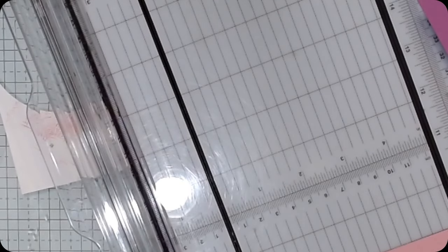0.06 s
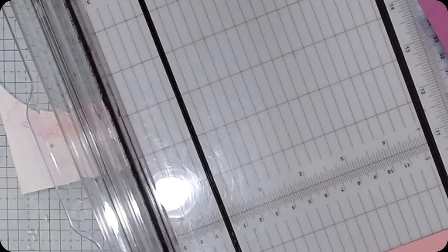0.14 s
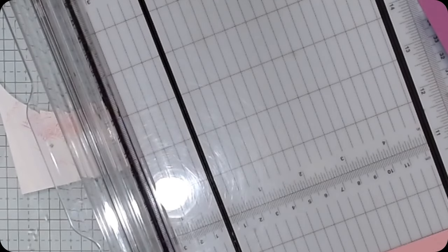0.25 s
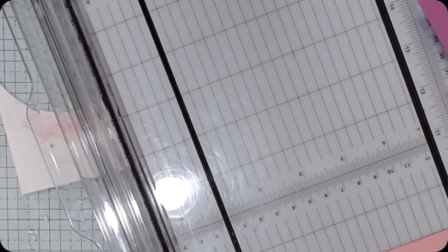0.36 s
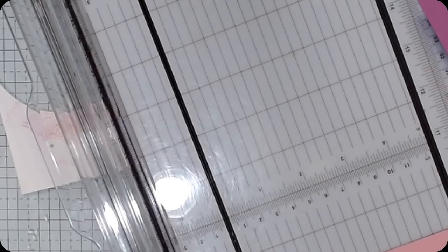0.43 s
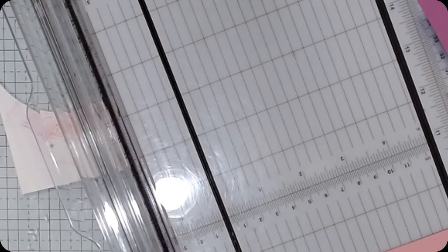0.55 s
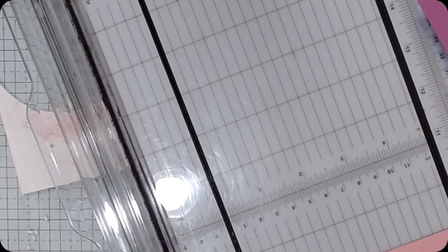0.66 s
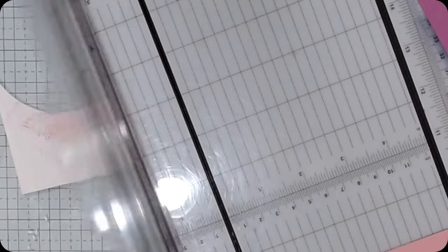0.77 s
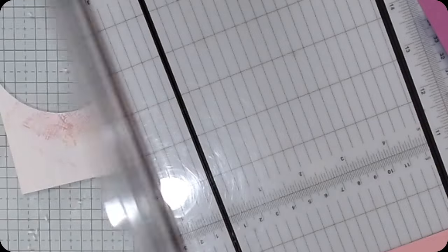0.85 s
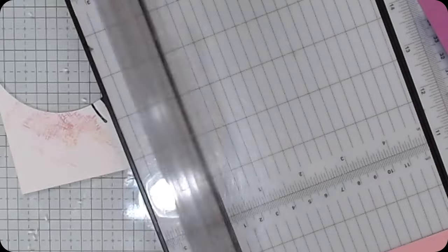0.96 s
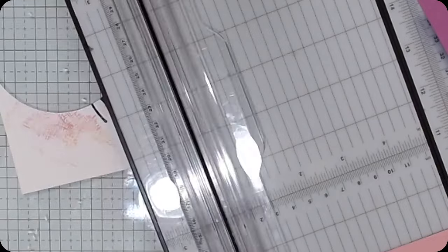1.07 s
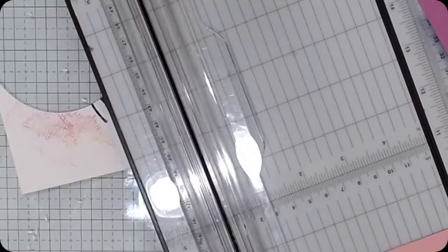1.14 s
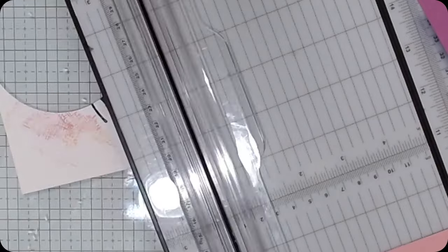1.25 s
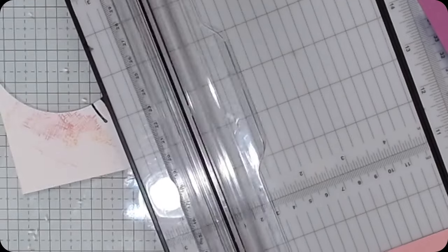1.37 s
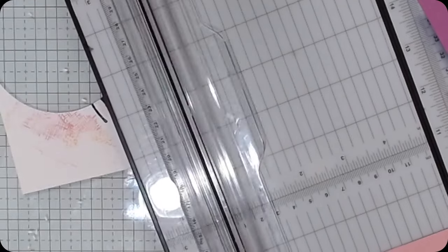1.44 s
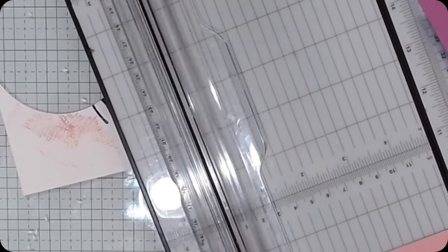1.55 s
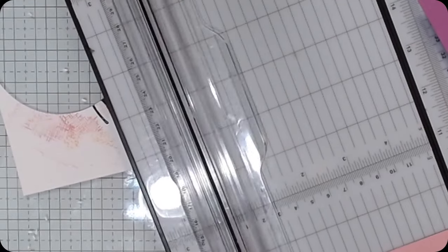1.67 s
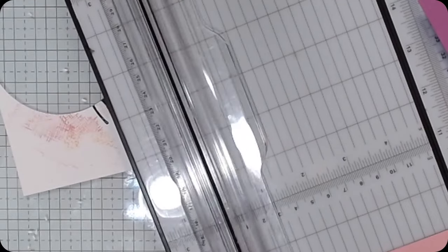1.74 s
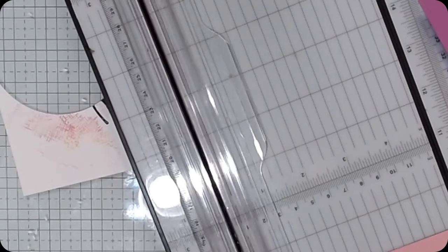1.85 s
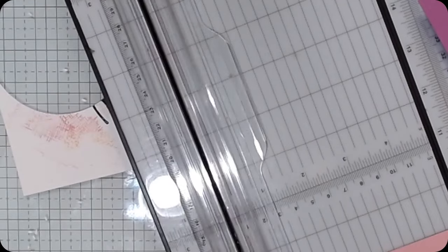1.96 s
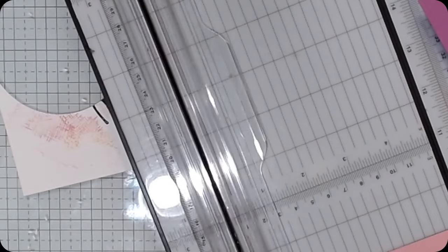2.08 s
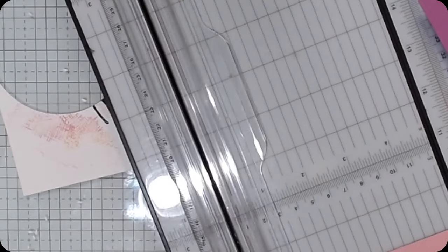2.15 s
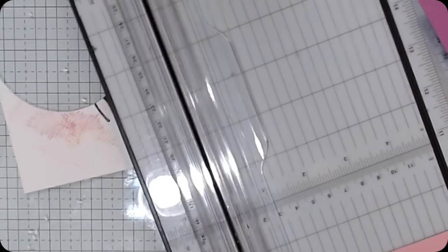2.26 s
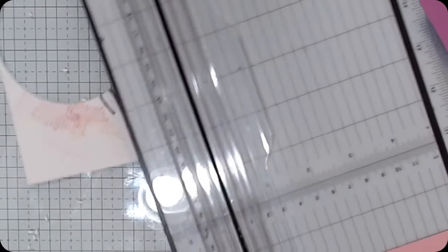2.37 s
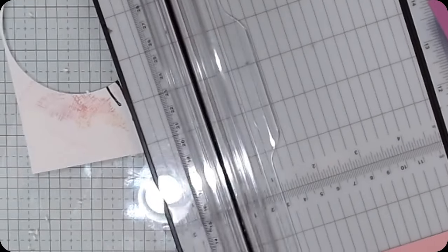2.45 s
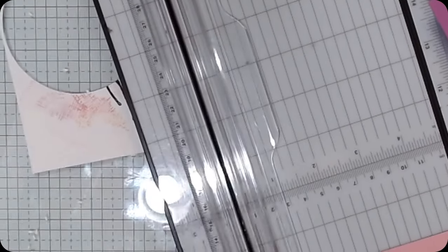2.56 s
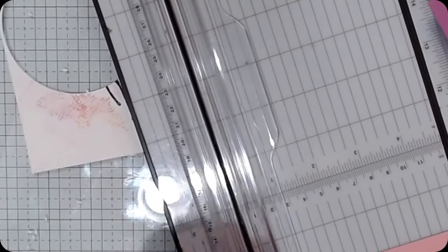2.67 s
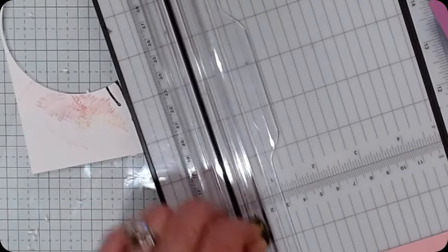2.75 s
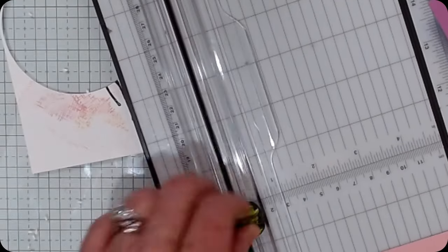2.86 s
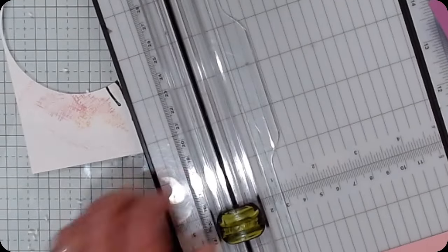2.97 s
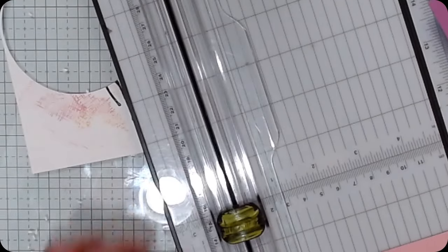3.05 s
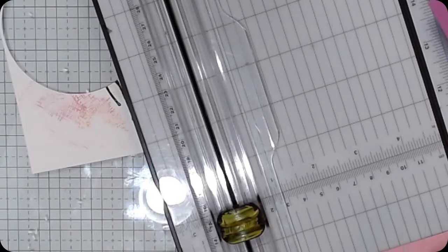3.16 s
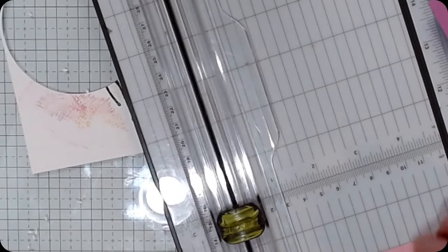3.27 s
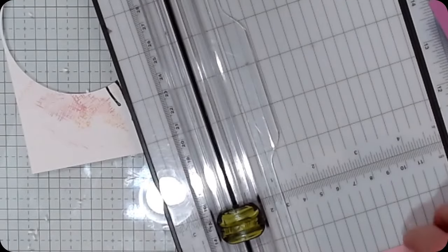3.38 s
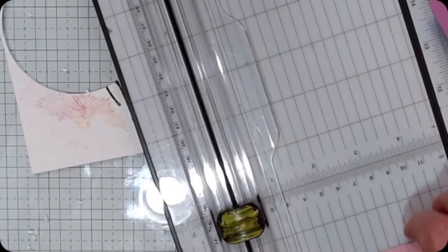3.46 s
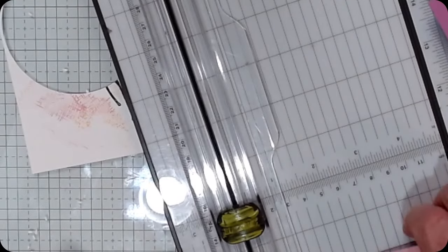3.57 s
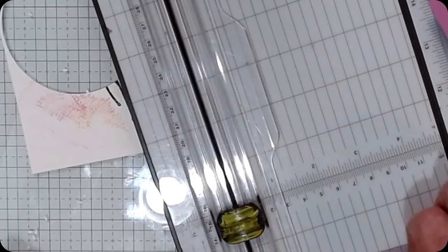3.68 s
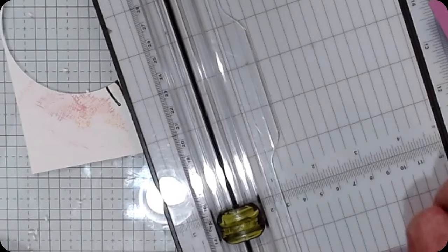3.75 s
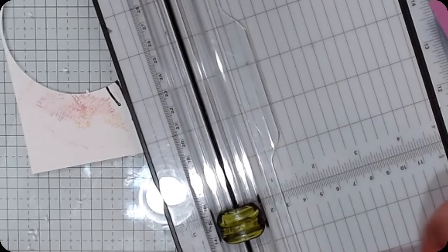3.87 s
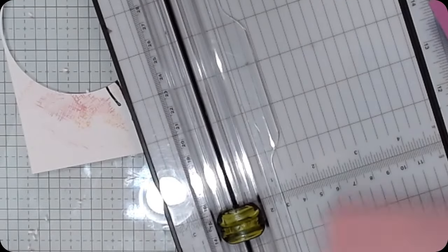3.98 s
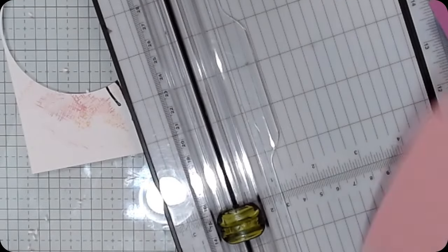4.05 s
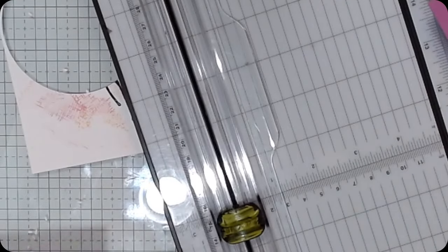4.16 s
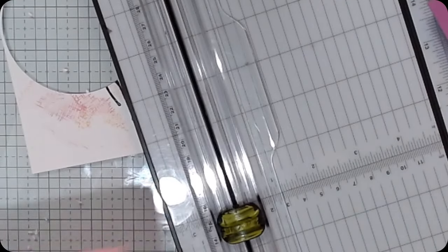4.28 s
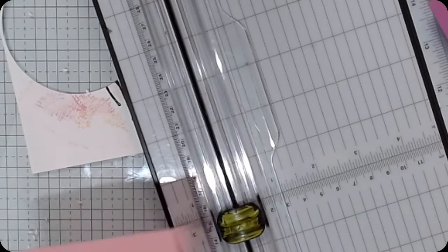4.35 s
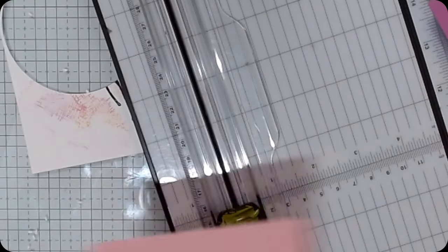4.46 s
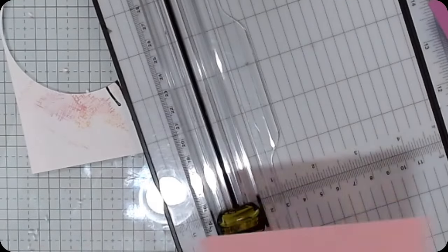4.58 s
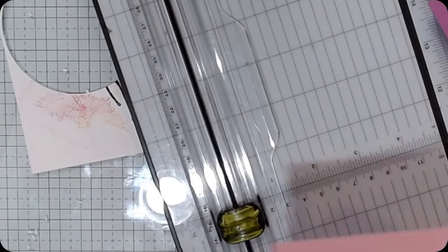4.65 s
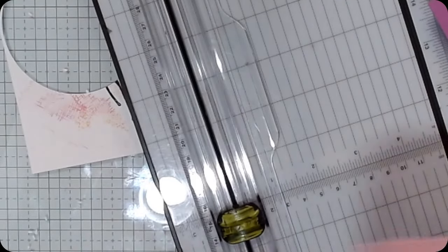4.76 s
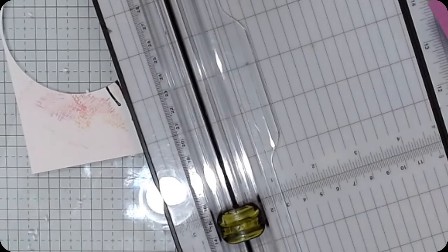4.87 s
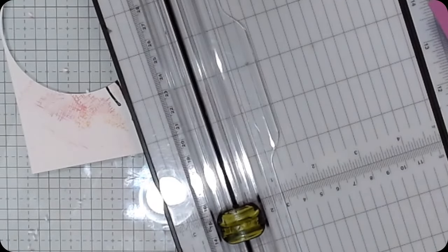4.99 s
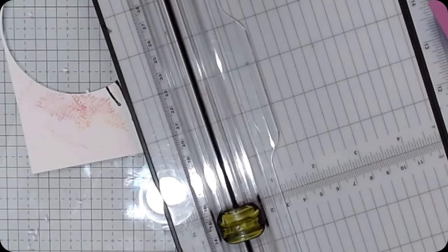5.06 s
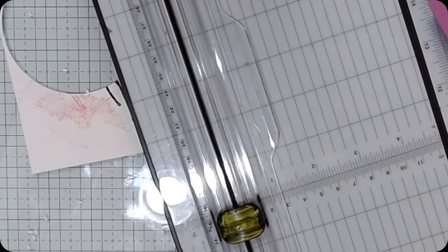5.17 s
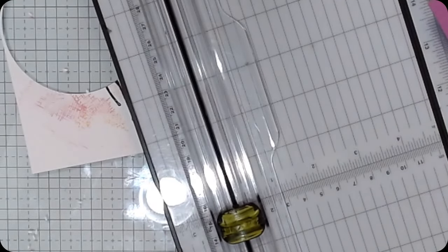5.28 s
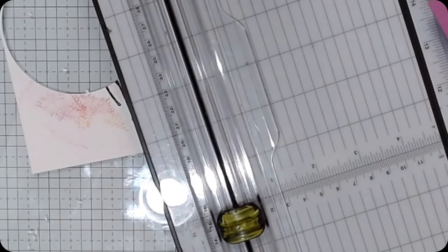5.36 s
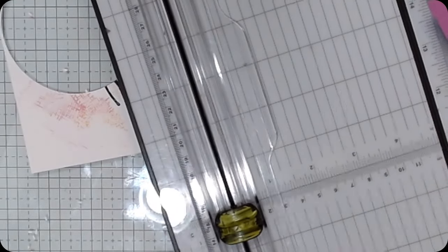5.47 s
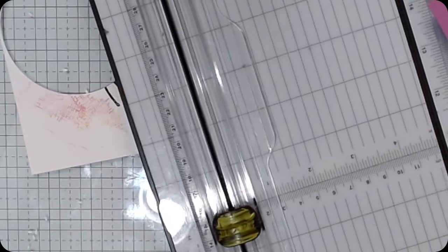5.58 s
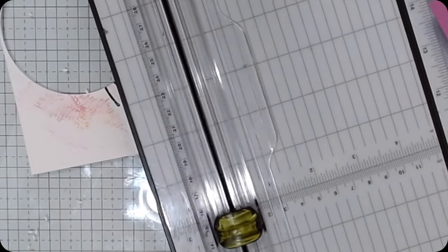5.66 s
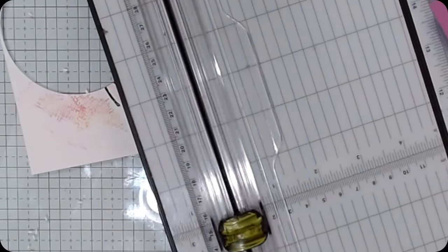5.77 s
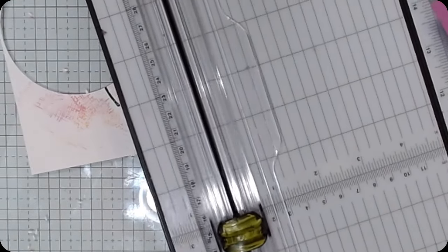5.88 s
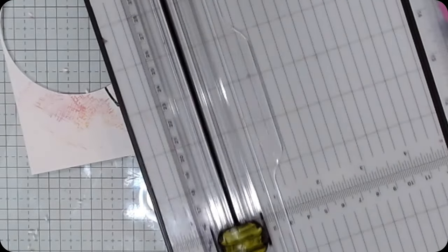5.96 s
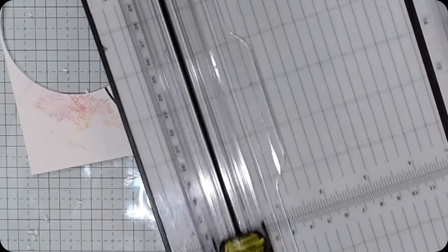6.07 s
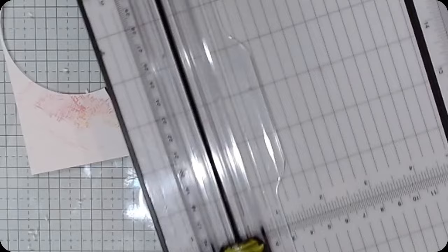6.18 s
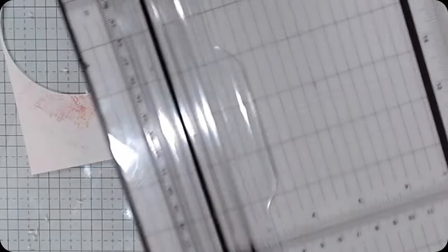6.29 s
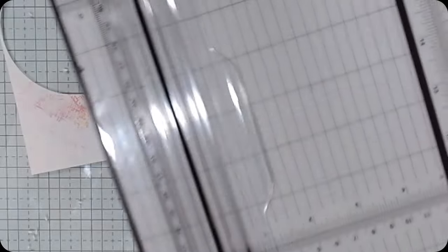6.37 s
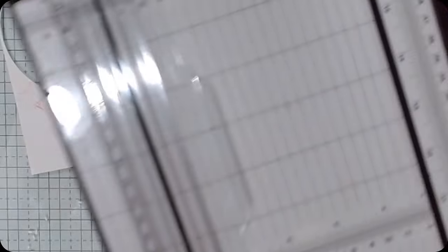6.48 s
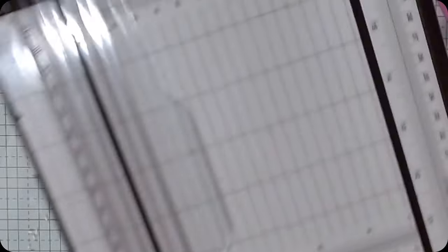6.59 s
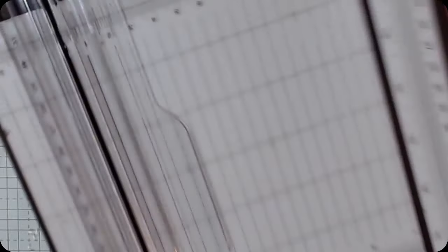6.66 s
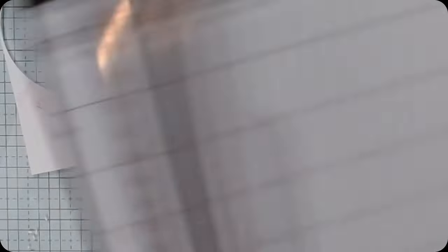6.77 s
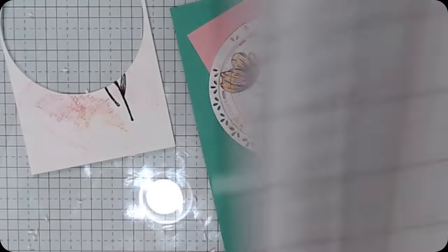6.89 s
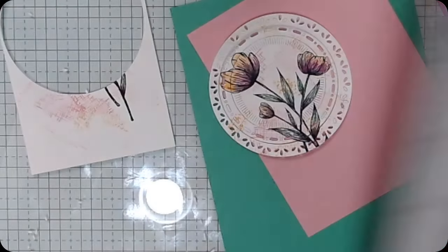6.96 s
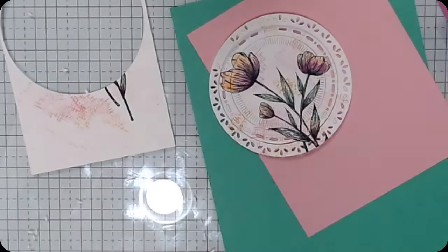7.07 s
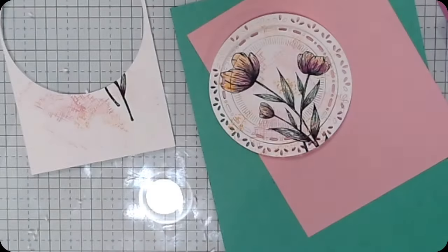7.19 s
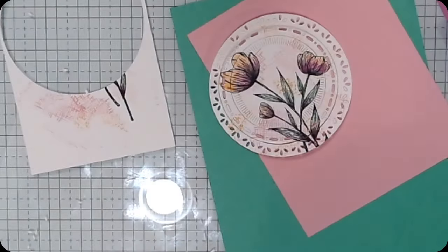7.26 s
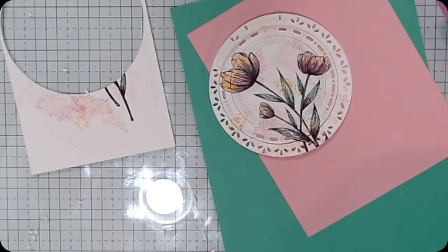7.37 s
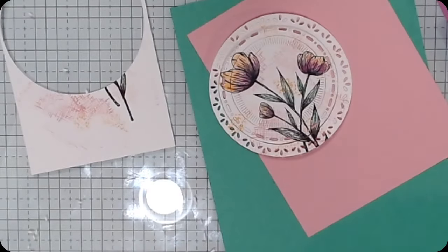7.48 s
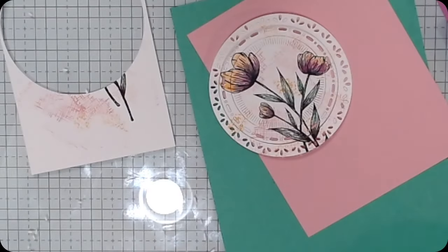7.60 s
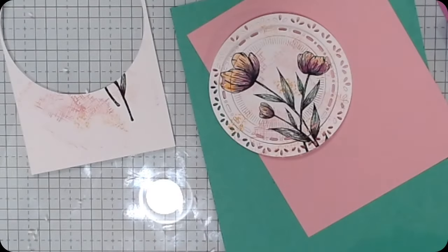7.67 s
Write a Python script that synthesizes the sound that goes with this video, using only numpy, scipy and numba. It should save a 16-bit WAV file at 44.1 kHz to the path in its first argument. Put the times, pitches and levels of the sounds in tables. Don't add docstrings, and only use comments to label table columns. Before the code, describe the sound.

A plastic paper trimmer is handled on a craft table in a small quiet room. After near silence, its hollow rail drops with a rattle and the latch snaps very sharply. A short rasping carriage slide ends in a knock, followed by crisp card snaps, taps and dry rustles. Sparse clicks continue until the base briefly judders over the mat and is lifted away. Close stereo microphones, dullish top, low ventilation and faint mains hum.

```python
import sys
import numpy as np
from scipy import signal
from scipy.fft import rfft, irfft
from scipy.io import wavfile
from scipy.ndimage import uniform_filter1d
from numba import njit

SR = 44100
rng = np.random.default_rng(int(sys.argv[2]) if len(sys.argv) > 2 else 0)


def materialize(psi):
    bounded = np.clip(np.atleast_2d(psi).T, -1, 1)
    quanta = np.round(bounded * 32767).astype(np.int16)
    wavfile.write(sys.argv[1], SR, quanta)


def magnitude_from_level(level_db):
    exponent = np.asarray(level_db, float) / 20
    return 10 ** exponent


N = 340893
T_S = np.arange(N) / SR


# (frequency [Hz], level [dB], t60 [s])
RAIL_MODES = [(610, -7, .035), (790, -6, .022), (985, -5, .018), (1240, -4, .016), (1530, -2, .013),
              (1750, -2, .012), (2000, -1, .011), (2300, -1, .01)]
# (frequency [Hz], level [dB], t60 [s])
EDGE_MODES = [(2860, 0, .012), (3310, -1, .011), (3560, -2, .01), (4090, -3, .008), (4700, -3, .007),
              (5400, -5, .006), (6300, -10, .005)]
# (frequency [Hz], level [dB], t60 [s])
TABLE_MODES = [(93, -2, 0.074), (133, -12.5, 0.34), (173, -1, 0.13), (266, 6.5, 0.025), (380, 0, 0.038)]


def strike(blows, thud_db, rattle_ms, tick, rise):
    size = 4000
    out, t = np.zeros(N + size), np.arange(size) / SR
    rattle_s = rattle_ms / 1000
    for s, db, own_hz, crack_db in blows:
        ragged = rng.standard_normal(size) * np.minimum(t / (rise * rattle_s), 1)
        ragged[0] = tick
        settle = np.exp(-t / 0.02)
        loose = butter(ragged * settle, 1, (600, 4300))

        own = [(own_hz, 8 + 2 * np.log2(own_hz / 1000), 15 / own_hz)]
        rail = RAIL_MODES + (own if own_hz < 2500 else [])
        edges = EDGE_MODES + (own if own_hz >= 2500 else [])
        body_contact = ragged * (np.exp(-t / rattle_s) + magnitude_from_level(-21.5) * settle)
        edge_contact = ragged * (np.exp(-t / (0.7 * rattle_s)) + magnitude_from_level(-31.5) * settle)
        body = ring(rail, body_contact, (560, 2900), snap=5, scatter_db=1.5)
        crack = ring(edges, edge_contact, (2600, 5900), snap=6, scatter_db=1)
        thud = ring(TABLE_MODES, np.hanning(60), (50, 500), snap=0, scatter_db=5)

        hit = body + magnitude_from_level(-15.5) * loose - magnitude_from_level(crack_db) * crack + magnitude_from_level(thud_db) * thud
        i = int((s + 0.0006) * SR)
        out[i:i + size] += magnitude_from_level(db) * hit
    return out[:N]


def ring(modes, contact, band_hz, snap, scatter_db, detune=0.063):
    t = np.arange(4000) / SR
    hz, db, t60_s = np.transpose(modes)[:, :, None]
    pitch_spot, level_spot = rng.standard_normal((2, len(modes), 1))
    tones = np.sin(2 * np.pi * hz * (1 + detune * pitch_spot) * t) * decay(t, t60_s)
    sense = (-1.) ** np.arange(len(modes))[:, None]
    tones = np.sum(sense * magnitude_from_level(db + scatter_db * level_spot) * tones, axis=0)
    tones[0] = snap * np.sqrt(np.sum(tones ** 2))
    y = butter(signal.fftconvolve(tones, contact)[:len(t)], 3, band_hz)
    return y / np.max(np.abs(y))


# (time [s], body peak [dB], own ring [Hz], crack re body [dB])
SLAMS = [
    (1.1309, -16.5, 800, -30),
    (1.138, -17.5, 3330, -8),
    (1.148, -21.5, 590, -23),
    (1.7761, -16, 1430, -8),
    (1.792, -20, 899, -19.5),
    (1.821, -20, 1480, -7),
]


def slams():
    return strike(SLAMS, thud_db=-18.5, rattle_ms=4, tick=0.6, rise=0.6)


# (time [s], body peak [dB], own ring [Hz], crack re body [dB])
STOPS = [
    (1.8105, -7, 1900, 0.95),
    (2.7595, -22, 693, 1),
]


def stops():
    return strike(STOPS, thud_db=-22.5, rattle_ms=2.9, tick=1.4, rise=0.31)


# (time [s], body peak [dB], own ring [Hz], crack re body [dB])
CLICKS = [(0.791, -31, 1300, -9.5), (1.372, -35.5, 1270, -17), (1.378, -36, 844, -23),
          (1.391, -38.5, 580, -32), (2.014, -35, 750, -10.5), (2.102, -52.5, 950, -4),
          (2.269, -25.5, 810, 0), (3.375, -27, 750, -1), (3.561, -32.5, 2126, -6.5), (3.57, -33, 2040, -24),
          (3.578, -35, 1380, -17), (3.886, -33, 1366, -15), (4.217, -36, 1090, -1),
          (4.703, -48.5, 900, 0.5), (4.732, -36, 1200, -4), (4.783, -42.5, 1540, -12),
          (5.435, -36, 2790, 3), (5.512, -49, 2830, -17), (5.636, -45.5, 1870, 5.5),
          (5.745, -29.5, 770, -13), (5.788, -45.5, 735, -26), (6.126, -50.5, 764, -14.5),
          (6.451, -37.5, 760, -5), (6.462, -37.5, 750, -15)]


def clicks():
    return strike(CLICKS, thud_db=-18, rattle_ms=1, tick=3.1, rise=0.6)


# (time [s], body peak [dB], own ring [Hz], crack re body [dB])
KNOCKS = [(1.1, -34.5, 1000, -12), (0.977, -49, 778, -21), (1.03, -41.5, 1740, -26), (1.859, -29, 590, -10),
          (2.034, -37.5, 901, -25), (2.765, -21.5, 870, -11), (3.3615, -26.5, 1650, -1.5),
          (3.75, -41.5, 2420, 2), (3.894, -26.5, 1373, -1), (3.913, -24.5, 1446, -10),
          (5.305, -44, 1430, -29), (5.544, -53.5, 746, -28), (5.928, -56, 1650, -13),
          (5.95, -35.5, 2010, -4), (6.469, -34.5, 762.4, -6), (6.839, -38.5, 1725, -9),
          (7.006, -58, 1720, 7)]


def knocks():
    return strike(KNOCKS, thud_db=-19, rattle_ms=3.1, tick=0.25, rise=0.33)


# (time [s], body peak [dB], own ring [Hz], crack re body [dB])
SNAPS = [
    (2.9205, -26.5, 3680, 2.5),
    (3.8775, -24.5, 3030, 0.5),
    (3.9715, -22.5, 1470, -8),
]


def snaps():
    return strike(SNAPS, thud_db=-26, rattle_ms=1.3, tick=3.1, rise=0.5)


# (time [s], body peak [dB], own ring [Hz], crack re body [dB])
SCUFFS = [(3.003, -29.5, 1800, -8), (5.1, -44.5, 1600, -7), (3.732, -48.5, 2000, 2), (3.2, -48, 1900, 18),
          (3.853, -45, 1700, -1), (3.951, -34.5, 3360, 4.5), (1.803, -22.5, 940, -4.5),
          (1.862, -30, 790, -4), (3.581, -40.5, 617, -12), (3.382, -39, 1600, 3), (1.165, -35.5, 620, -0.5),
          (1.205, -39, 1300, -14), (1.4, -46, 1200, -20), (1.2, -53, 1400, -4), (2.4, -52.5, 1300, -12.5),
          (2.262, -44, 790, -7), (1.178, -37, 890, -12), (3, -36.5, 600, -14), (3.4, -39, 900, -6)]


def scuffs():
    return strike(SCUFFS, thud_db=-15, rattle_ms=5.4, tick=0.064, rise=1.1)


# (time [s], body peak [dB], own ring [Hz], crack re body [dB])
BUMPS = [(0.901, -50, 780, -29), (1.579, -53.5, 824, -2), (1.705, -30, 1300, -14.5),
          (2.221, -34.5, 740, -11), (2.28, -33, 820, -6.5), (3.168, -43, 780, -12), (3.463, -36, 620, -15),
         (4.196, -57, 1096, -14), (4.365, -52.5, 1300, -22), (4.386, -40.5, 1550, -22),
         (4.414, -53, 1690, 3), (5.399, -58, 611, -11), (6.3, -56.5, 630, -13.5), (7.202, -61.5, 1030, -9)]


def bumps():
    return strike(BUMPS, thud_db=-9.5, rattle_ms=5.1, tick=0.2, rise=0.5)


# (time [s], body peak [dB], own ring [Hz], crack re body [dB])
TAPS = [
    (0.412, -53.5, 526, 11),
    (0.435, -50, 675, -12),
    (2.193, -55, 776, 5.5),
    (3.292, -45.5, 657, 3),
    (3.304, -38.5, 593, -2),
    (3.314, -29, 610, -4),
]


def taps():
    return strike(TAPS, thud_db=-1.6, rattle_ms=1.5, tick=0.72, rise=1)


# (time [s], peak [dB], frequency [Hz], t60 [s], length of touch [ms])
RINGS = [(1.138, -25, 3500, 0.028, 3.5), (1.15, -33.5, 618, 0.093, 2.3), (1.236, -46.5, 977, .05, 8),
         (1.812, -22.5, 616, 0.052, 1.5), (1.853, -36, 702, .04, 3.2), (2.92, -33.5, 3900, 0.014, 1.2),
         (3.007, -35, 1450, 0.022, 3.4), (3.303, -29, 654, 0.018, 1.7), (3.394, -36, 650, 0.015, 2.5),
         (3.502, -53, 4300, .03, 6.2), (3.749, -39, 2670, 0.023, 2.8), (3.879, -18.5, 3115, 0.007, 0.63),
         (5.307, -49, 1410, 0.023, 3.1), (5.432, -46, 2900, 0.042, 1.5), (5.45, -52, 680, 0.036, 3.4),
         (5.512, -48.5, 2850, 0.031, 2.3), (5.512, -56, 1300, .04, 3.8), (5.53, -53.5, 744, 0.067, 14),
         (5.575, -54, 877, 0.047, 11), (5.745, -39.5, 738, 0.058, 1), (5.746, -43.5, 2010, 0.05, 1.3),
         (3.311, -35, 182, 0.057, 5.3), (3.317, -38, 395, .03, 5), (3.329, -40, 254, 0.046, 4),
         (3.574, -43.5, 243, 0.043, 6), (3.586, -44.5, 443, 0.026, 3.9), (3.912, -41, 336, 0.026, 5.4),
         (6.406, -65, 2690, 0.087, 44), (0.961, -67.5, 5500, .02, 77), (6.05, -63.5, 2850, 0.092, 39),
         (2.765, -41.5, 294, 0.069, 3.9), (2.764, -52, 100, 0.094, 5.6), (1.134, -39.5, 142, 0.16, 5.2),
         (1.028, -45, 1730, 0.029, 2.7), (4.382, -45.5, 1510, 0.053, 3.9), (5.959, -57, 2850, 0.19, 37),
         (5.96, -50, 727, 0.08, 34), (6.84, -55, 1720, 0.14, 29), (7.004, -58, 1700, 0.063, 4.6)]


def rings():
    size = 8000
    out, t = np.zeros(N + size), np.arange(size) / SR
    for s, db, hz, t60_s, touch_ms in RINGS:
        tone = np.sin(2 * np.pi * hz * t)
        rough = 1 + 1.2 * unit(uniform_filter1d(rng.standard_normal(size), 120))
        touch = rough * np.exp(-t / (touch_ms / 1000)) * tone
        y = signal.fftconvolve(touch, tone * decay(t, t60_s))[:size]
        i = int(s * SR)
        out[i:i + size] += magnitude_from_level(db) * y / np.max(np.abs(y))
    return out[:N]


# (time [s], level [dB], blade hiss re level [dB])
SLIDE = [(2.33, -45, -11), (2.362, -39.5, -1), (2.416, -36.5, 1), (2.45, -43, 4.5), (2.514, -38.5, 4.5),
         (2.534, -39, 5.5), (2.734, -38, 0), (2.757, -31, 3)]
# (frequency [Hz], width [Hz], level [dB], time at liveliest spot [s], reach [s])
TRACK_MODES = [(680, 150, 9.7, 2.74, 0.17), (956, 220, 16.3, 2.4, 0.053), (1470, 440, 12.2, 2.64, 0.4),
               (635, 120, 6.7, 2.44, 0.099), (1300, 1200, 5, 2.55, .5), (1960, 460, 4.1, 2.68, 0.061)]
# (frequency [Hz], width [Hz], level [dB], time at liveliest spot [s], reach [s])
BLADE_MODES = [(2900, 200, 11.5, 2.54, .08), (3360, 480, 11.5, 2.42, 0.039), (3190, 190, 14.5, 2.56, 0.069),
               (3450, 200, 11, 2.73, 0.051), (4160, 340, 13.5, 2.56, 0.081), (4800, 320, 11, 2.39, .06),
               (5130, 300, 6.5, 2.52, 0.033), (5660, 480, 10, 2.65, .07), (4800, 300, 14.5, 2.73, 0.048),
               (6460, 400, 4.5, 2.5, 0.4), (2440, 350, 5, 2.39, 0.043), (2250, 440, 7, 2.7, 0.044),
               (3900, 240, 1, 2.66, 0.039)]


def slide():
    gain, hiss_db = curve(SLIDE)
    chatter = magnitude_from_level(1.1 * walk(120))
    slips, edge, bare = (grit(1.9) * chatter for _ in range(3))

    def lively_db(s, reach_s):
        return -11 * np.minimum(((T_S - s) / reach_s) ** 2, 1)

    track = 0
    for hz, width, db, s, reach_s in TRACK_MODES:
        level = magnitude_from_level(db + lively_db(s, 1.53 * reach_s) + 2.4 * walk(25))
        track = track + level * unit(band(slips, hz, width))

    blade, sense = 0, 1
    for hz, width, db, s, reach_s in BLADE_MODES:
        level = magnitude_from_level(db + lively_db(s, 1.8 * reach_s) + 2.5 * walk(40))
        climbing_hz = hz * (1 + 0.13 * np.clip(T_S - s, -0.2, 0.2))
        mode = band(band(edge, hz, 3 * width), climbing_hz, width)
        blade = blade + sense * level * unit(mode)
        sense = -sense
    scrape = unit(band(bare, 3500, 3600))
    blade = butter(even(blade) + magnitude_from_level(-5) * scrape, 2, (1900, 6300))

    rumble = unit(band(band(slips, 160, 270), 220, 400)) * magnitude_from_level(-54 + 2.6 * walk(13))
    return gain * (even(track) + magnitude_from_level(hiss_db) * even(blade)) + (gain > 0) * rumble


# (frequency [Hz], level [dB per Hz])
CARD_SPECTRUM = [(180, -36.0), (300, 4.5), (546, 2.0), (722, -4.0), (1600, -10), (1760, -10.0),
                 (3420, -5.0), (6060, -7.5), (7200, -12.5), (9360, -42), (15800, -120)][:-2]
# (peak time [s], rustle [dB], 20 dB rise [s], 20 dB fall [s], hiss re rustle [dB])
BRUSH = [(.438, -62, .14, .02, 7), (1.035, -68, 0.12, 0.04, 4), (1.584, -60, 0.0265, 0.05, -5),
         (3.178, -60, -0.0041, -0.17, -7.5), (3.28, -64, .11, .021, -1), (3.471, -44, 0.0715, -0.0024, -3),
         (3.52, -58, 0.05, 0.04, 2), (3.754, -55, 0.02, 0.0127, 2), (3.8, -59, .06, .06, 14),
         (3.43, -52, .1, .06, 5), (3.68, -62, .03, .04, -2), (3.86, -60, .06, .03, 6),
         (3.92, -47, 0.04, 0.03, -5), (3.962, -46, 0.0158, 0.0074, 5), (4.106, -65, 0.12, 0.1, 10),
         (4.2, -60, 0.04, 0.0383, 3), (4.74, -55, 0.0979, 0.0034, -5), (4.85, -69, 0.2642, 0.32, 5.5),
         (5.064, -61.5, 0.2, 0.16, 4), (5.316, -60.5, 0.05, 0.04, -3), (5.52, -63, 0.0424, 0.36, 1),
         (6.31, -69.5, 0.15, 0.08, -11), (6.58, -68, 0.0841, 0.0671, 1.5), (7.02, -70.5, 0.27, 0.44, 5),
         (7.21, -68.5, 0.214, 0.15, 2.5), (7.56, -64, 0.0143, 0.16, -4)]
# (time [s], rustle [dB], 20 dB fall [s], hiss re rustle [dB])
SETTLE = [(0.808, -56, 0.11, -6.5), (0.85, -66.5, 1.24, -12), (1.17, -48, 0.15, -4.5),
          (1.785, -34.5, 0.18, -6.5), (2.792, -51.5, -0.09, 2.5), (2.94, -63.5, -2.2, -0.5),
          (3.04, -68, -0.76, -7), (3.324, -48.5, -0.08, 4), (3.384, -57, 0.57, 4.5), (3.6, -61, 0.23, -6),
          (3.988, -57.5, -0.2, -7), (4.239, -60, 0.27, 1.5), (4.373, -54, 0.03, -6), (5.46, -63, 0.32, -11),
          (6.099, -63, 0, -12), (6.477, -37.5, 0.03, -2.5)]


def brush():
    fibres = colour(grit(2.2), CARD_SPECTRUM)
    rustle = unit(band(band(fibres, 1500, 1900), 1200, 1900)) * magnitude_from_level(1.1 * walk(90))
    hiss = unit(butter(fibres, 4, 2400, "high")) * magnitude_from_level(0.9 * walk(110))
    out = np.zeros(N)
    for s, db, rise_s, fall_s, hiss_db in BRUSH:
        out += swell(s, db, rise_s, fall_s) * (rustle + magnitude_from_level(hiss_db) * hiss)
    for s, db, fall_s, hiss_db in SETTLE:
        out += swell(s, db, 0.017, fall_s) * (rustle + magnitude_from_level(hiss_db) * hiss)
    return out


# (time [s], level [dB], 20 dB rise [s], hold [s], 20 dB fall [s])
DRAGS = [
    (5.93, -48, .004, .065, .06),
    (6.826, -59, .004, .075, .04),
]
# (frequency [Hz], width [Hz], level [dB])
DRAG_MODES = [
    [(727, 14, 4.5), (1285, 390, 13), (2010, 220, 12), (2850, 10.4, 13.5), (3500, 36.8, -9),
     (3910, 30, -35), (4920, 78, -36), (6160, 45, -31)],
    [(1200, 50, -16), (1680, 64, 1), (2100, 39, -15), (2390, 27, -7), (3500, 74, -6), (3960, 120, -1),
     (4880, 88, -6), (6350, 71, -18)],
]
DRAG_GRAIN = [0.52, 1.46]


def drag():
    out = 0
    for (s, db, rise_s, hold_s, fall_s), modes, grain in zip(DRAGS, DRAG_MODES, DRAG_GRAIN):
        slips = grit(3.6) * magnitude_from_level(1.43 * walk(70))
        push = swell(s, db, rise_s, fall_s, hold_s) * slips

        def heard(hz, width):
            return band(push, hz, width) / np.std(band(slips, hz, width))

        sung = sum(magnitude_from_level(mode_db) * heard(hz, width + 15) for hz, width, mode_db in modes)
        total = np.sqrt(np.sum(magnitude_from_level(np.array(modes)[:, 2]) ** 2))
        out = out + sung / total + grain * heard(1800, 6100)
    return out


# (time [s], peak [dB], frequency [Hz])
LEANS = [(0.098, -53, 48.3), (.42, -55, 59), (1.8, -51, 32.8), (2.25, -57.5, 40), (2.999, -65.5, 46.5),
         (3.301, -48, 46.3), (3.568, -55, 38), (4.72, -61, 50.8), (6.878, -58.5, 57.8)]


def leans():
    half = SR // 2
    out, t = np.zeros(N + SR), np.arange(-half, half) / SR
    for s, db, hz in LEANS:
        i = int(s * SR)
        out[i:i + len(t)] += magnitude_from_level(db) * np.sin(2 * np.pi * hz * t) * np.exp(-(hz * t / 2.5) ** 2)
    return out[half:half + N]


# (frequency [Hz], t60 [s], level re direct [dB])
ROOM = [(153.8, 0.28, -16), (460, 0.28, -14), (1200, 0.22, -19), (2730, 0.2, -21), (5000, 0.082, -19)]


def room(x):
    t = np.arange(SR // 2) / SR
    shared, tails = rng.standard_normal(len(t)), np.zeros((2, len(t)))
    for hz, t60_s, db in ROOM:
        for tail in tails:
            noise = shared + min((hz / 720) ** 2, 4) * rng.standard_normal(len(t))
            onset = np.clip(t / 0.004 - 1, 0, 1)
            part = band(noise, hz, hz) * decay(t, t60_s) * onset
            tail += magnitude_from_level(db) * part / np.sqrt(np.sum(part ** 2)) * np.sqrt(hz / 8000)
    return signal.fftconvolve(x[None], 1.88 * tails, axes=1)[:, :N]


# (frequency [Hz], level [dB per Hz])
AIR_SPECTRUM = [(13, -30.5), (22, 4.0), (64, -1.0), (294, -12), (403, -13.5), (489, -11.0), (638, -17.0),
                (875, -17.5), (987, -22.5), (1600, -24.0), (4230, -34.0), (5790, -35.0), (7200, -38.0),
                (9360, -69), (15800, -120)][:-2]
# (frequency [Hz], rms [dB])
HUM = [(59.3, -64), (118, -71.5), (180, -88.5)]


def air():
    mid, side = (colour(rng.standard_normal(N), AIR_SPECTRUM) for _ in range(2))
    side = colour(side, [(30, -6.5), (300, -5), (600, -6.5), (2000, 2)])
    out = unit(mid + side * np.array([[1.15], [-0.85]]))
    out = out * magnitude_from_level(-58 + np.array([[-0.9], [0.7]]) + 0.36 * walk(5.7))
    phase = np.array([[0.75], [-0.75]])
    for hz, db in HUM:
        out = out + np.sqrt(2) * magnitude_from_level(db + 2 * walk(18)) * np.sin(2 * np.pi * hz * T_S + phase)
    return out


def unit(x):
    return x / np.sqrt(np.mean(x ** 2))


def even(x):
    return x / np.sqrt(uniform_filter1d(x ** 2, 1500) + 1e-12)


def decay(t, t60_s):
    return np.exp(-np.log(1000) * t / t60_s)


def butter(x, order, hz, kind="band"):
    return signal.sosfilt(signal.butter(order, hz, kind, fs=SR, output="sos"), x)


def curve(rows):
    s, *cols = np.transpose(rows)
    level_db, *others = [np.interp(T_S, s, c) for c in cols]
    fade = np.clip(np.minimum(T_S - s[0], s[-1] - T_S) / 0.01, 0, 1)
    return [magnitude_from_level(level_db) * fade] + others


def swell(s, db, rise_s, fall_s, hold_s=0.):
    t = np.arange(0, N, 16) / SR - s
    slope = np.minimum(t / abs(rise_s), (hold_s - t) / abs(fall_s))
    return np.repeat(magnitude_from_level(db + 20 * np.minimum(slope, 0)), 16)[:N]


@njit
def svf(x, hz, width):
    y, b, l, g, k = np.empty(len(x)), 0., 0., 0., 0.
    for i in range(len(x)):
        if i % 16 == 0:
            g, k = np.tan(np.pi * hz[i] / SR), width / hz[i]
        v = (b + g * (x[i] - l)) / (1 + g * (g + k))
        b, l, y[i] = 2 * v - b, l + 2 * g * v, k * v
    return y


def band(x, hz, width):
    return svf(x, np.clip(hz + np.zeros(len(x)), 20, 0.45 * SR), 1. * width)


def walk(rate_hz):
    k = int(SR / rate_hz)
    held = np.repeat(rng.standard_normal(N // k + 1), k)
    return 1.3 * uniform_filter1d(uniform_filter1d(held, k), k)[:N]


def colour(x, points):
    hz = np.maximum(np.fft.rfftfreq(N, 1 / SR), 1)
    point_hz, point_db = np.transpose(points)
    return irfft(rfft(x) * magnitude_from_level(np.interp(np.log(hz), np.log(point_hz), point_db)), N)


def grit(spread_db):
    size = np.minimum(rng.exponential(size=N // 16 + 1), 4)
    return unit(rng.standard_normal(N) * magnitude_from_level(spread_db * np.repeat(size, 16)[:N]))


def ports(work):
    left = colour(work, [(200, 0.5), (700, 0), (1200, -3), (2500, -7.5), (7000, -2.9)])
    right = np.roll(work, 1)
    n = np.arange(1500)
    bend = rng.standard_normal(len(n)) * np.exp(-n / SR / 0.01)
    bend = butter(bend / np.sqrt(np.sum(bend ** 2)), 2, 900, "high")
    side = magnitude_from_level(-11.5) * signal.fftconvolve(work, bend)[:N]
    return magnitude_from_level(2) * np.array([left + side, right - side])


def scene():
    work = slams() + stops() + clicks() + knocks() + snaps() + scuffs() + bumps() + taps()
    work = work + slide() + brush() + drag() + leans()
    return ports(work + rings()) + room(work) + air()


def band_limit(x):
    return signal.sosfilt(signal.butter(12, 8020, fs=SR, output="sos"), x)


def record(dry):
    ceiling, top_hz = 0.95, 8117
    rounded = ceiling * np.tanh(dry / ceiling)
    mix = signal.sosfilt(signal.cheby2(14, 60, top_hz, fs=SR, output="sos"), rounded)
    return band_limit(mix)


dry = scene()
out = record(dry)
materialize(out)
```